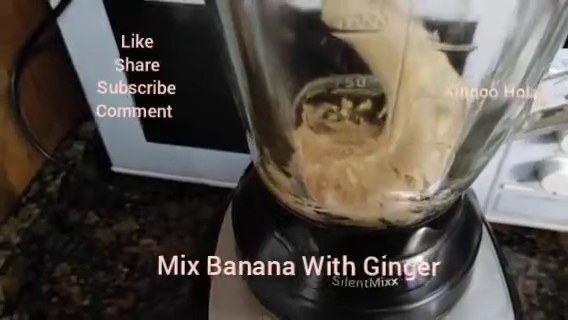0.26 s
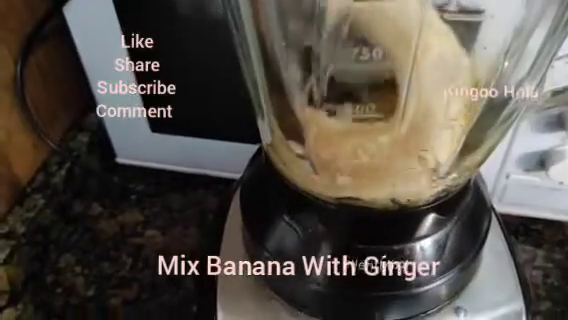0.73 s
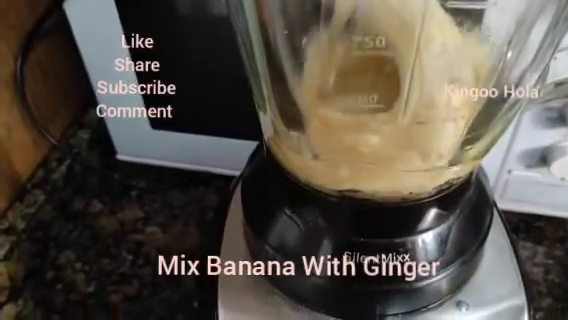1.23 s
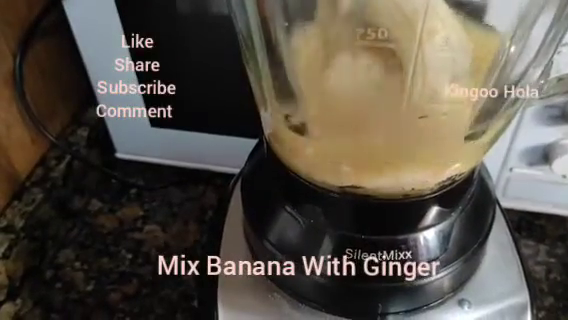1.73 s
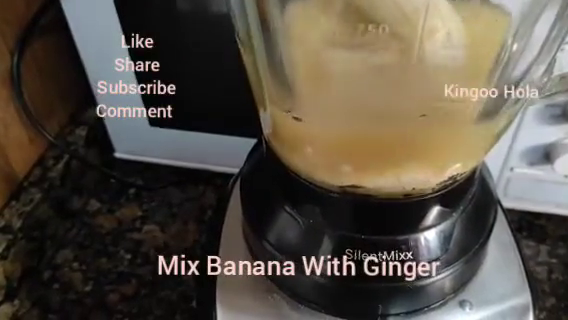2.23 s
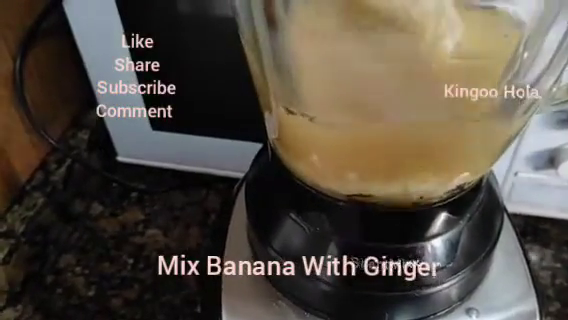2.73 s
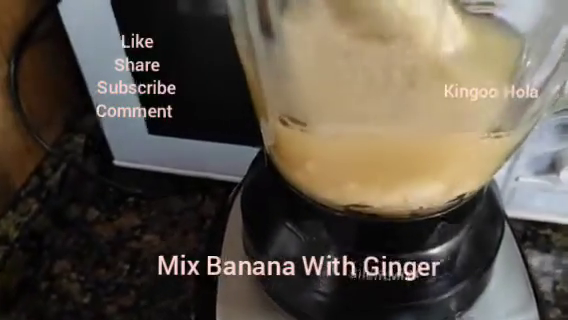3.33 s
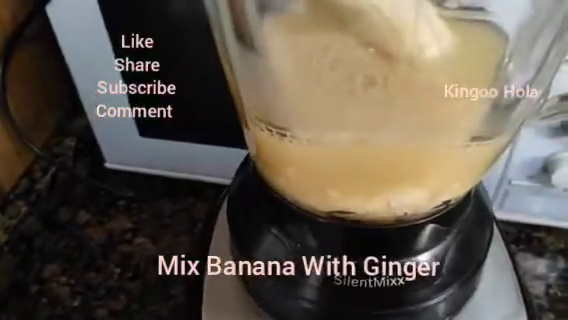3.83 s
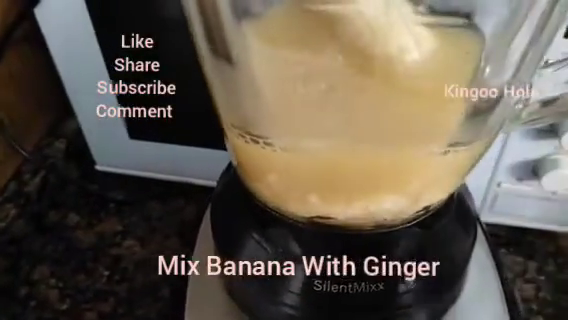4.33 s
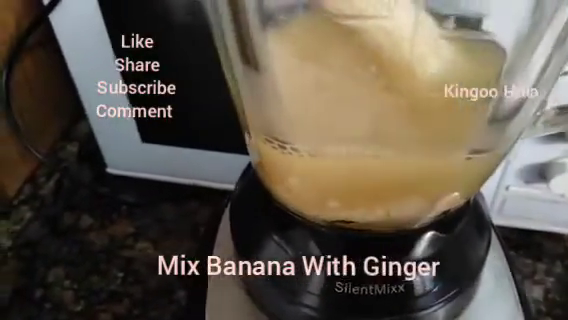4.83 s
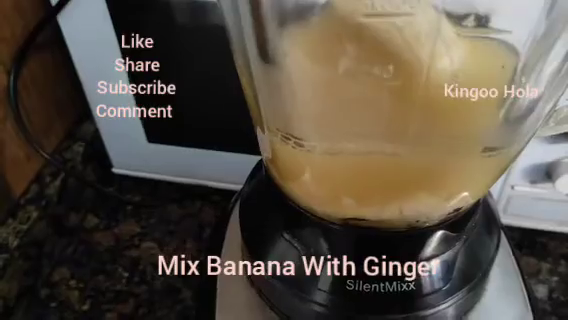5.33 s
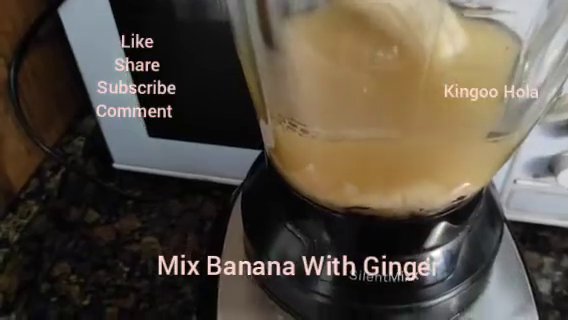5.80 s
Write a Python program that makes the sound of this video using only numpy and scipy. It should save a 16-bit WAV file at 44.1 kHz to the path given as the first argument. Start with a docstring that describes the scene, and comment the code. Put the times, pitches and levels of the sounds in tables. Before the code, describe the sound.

A thin wrapper crackles softly in a small hard kitchen, then a catch rattles open, a drawer thuds shut and a jar knocks the worktop.

```python
"""A thin wrapper rustles and crackles close by, a catch springs open with a rattle, things are touched lightly,
a drawer slides shut with a thud, and a jar is knocked down on the worktop, over air noise and a low rumble.
The wrapper is filtered noise and tiny clicks; catch, drawer and jar are damped modes with short noise bursts.
Every handled sound gets an answer from a small hard kitchen; only the jar's clear note stays dry."""
import sys
import numpy as np
from scipy import signal
from scipy.fft import rfft, irfft, next_fast_len
from scipy.io import wavfile
from scipy.ndimage import uniform_filter1d, map_coordinates

SR = 44100
rng = np.random.default_rng(int(sys.argv[2]) if len(sys.argv) > 2 else 0)


def file_out(sig):
    """Save sig as 16-bit WAV at sys.argv[1]."""
    # one column per channel
    cols = np.atleast_2d(sig).T
    # limit, then scale
    lim = np.clip(cols, -1, 1)
    pcm = np.round(lim * 32767).astype(np.int16)
    wavfile.write(sys.argv[1], SR, pcm)


N = 267246

# The background's slow swells. Each row: time in seconds, rumble level in dB, air level in dB.
BACKGROUND = [(0, -64.5, -59.5), (2.3, -72.5, -60), (2.7, -55.5, -59.5), (3.1, -61, -59), (3.5, -63.5, -59),
              (4.4, -61, -60.5), (5.0, -73, -60), (5.8, -61, -55.5)]
# Colour of the air noise. Each row: frequency in Hz, relative gain in dB.
AIR_SPECTRUM = [(12, -23.5), (20, -18.5), (49, -3.5), (70, -17), (191, -9.5), (219, -14.5), (298, -15.5),
                (324, -19), (767, -24), (881, -21.5), (1580, -30.5), (2270, -28), (4310, -36.5),
                (8400, -26.5), (15500, -77.5)]

# Pulls at the wrapper. Each row: start in seconds, length in seconds, then crumple, crackle and body level in dB.
PULLS = [(0.304, 0.038, -63, -56, -78), (.53, 0.31, -56.5, -51, -66), (0.861, 0.24, -51.5, -47, -69.5),
         (1.159, 0.14, -54.5, -70, -74), (1.403, 0.21, -58, -52.5, -58.5), (1.684, .1, -57, -56, -57.5),
         (1.885, .16, -57.5, -54, -55.5), (2.247, 0.037, -53.5, -51.5, -57), (2.393, 0.16, -59, -74, -85),
         (2.554, 0.15, -62.5, -51, -63)]
PULL_ATTACK_S, PULL_RELEASE_S = 0.0067, 0.25
# Growth over one pull as it tightens: crumple, crackle and body in dB.
PULL_SWELL_DB = [4.5, 4.5, 1.5]
# The sheet never lies still while it is held: crumple, crackle and body level in dB.
HELD_DB = [-60.5, -57.5, -69]
HELD_S, HELD_LENGTH_S = 0.48, 2.31
# Creases that snap. Each row: start in seconds, pitch in Hz, level in dB.
SNAPS = [(.316, 9100, -54), (.592, 8300, -58), (.614, 1740, -51), (.764, 8700, -48), (.886, 1730, -42),
         (.887, 7700, -47.5), (.966, 945, -51), (1.027, 7700, -38.5), (1.059, 1760, -44.5),
         (1.092, 6800, -38), (1.2, 6860, -48.5), (1.999, 6600, -48), (2.249, 6550, -45.5),
         (2.285, 5650, -49), (2.726, 3950, -48.5), (2.74, 5860, -42), (2.822, 5760, -53)]
SNAP_WIDTH, SNAP_T60_S = 0.18, 0.038  # width as a share of the pitch
# Dull bumps of what the wrapper holds. Each row: start in seconds, pitch in Hz, level in dB.
BUMPS = [(2.286, 645, -45.5), (2.675, 765, -44.5), (2.701, 700, -46.5), (2.765, 550, -45.5),
         (2.798, 504, -42.5)]
BUMP_WIDTH, BUMP_T60_S = 0.8, 0.046  # width as a share of the pitch
# Taut folds that hum. Each row: start in seconds, length in seconds, starting pitch in Hz, level in dB.
FOLDS = [(0.536, 0.26, 1077, -58), (0.881, 0.22, 1744, -56.5), (2.697, 0.024, 1440, -46)]
FOLD_CLIMB, FOLD_ATTACK_S, FOLD_RELEASE_S = 0.088, 0.0054, 0.035  # climb as a share of the starting pitch
# Colour of the wrapper. Each row: frequency in Hz, relative gain in dB.
WRAPPER_SPECTRUM = [(120, -26), (200, -18), (215, -34), (253, -7), (327, -12), (420, -7), (488, -1),
                    (596, -19), (677, -11.5), (1740, -9), (2210, -13), (4750, -11.5), (7220, -2.5),
                    (8980, -5.5), (10600, -26.5), (15500, -30.5)]

# The catch and its rattle. Each row: start in seconds, strength in dB, boom level in dB.
CATCH = [(3.691, -32.5, -63), (3.694, -19, -44.5), (3.7034, -34.5, -29), (3.7192, -29, -48.5),
         (3.724, -31.5, -47.5), (3.7392, -28, -33), (3.751, -33.5, -49.5)]
PANEL_DB, CATCH_CLICK_DB = -8.5, 0  # against the strength
# Modes of the catch's panel. Each row: frequency in Hz, level in dB, 60 dB decay in seconds.
PANEL_MODES = [(45.2, -20, .3), (84, -20, 0.49), (263, -3.5, 0.15), (356.5, -2, 0.13), (427, 3, 0.11),
               (486.6, 1, 0.13), (725, -12, .14), (1012, 0.5, 0.2), (1158, -7.5, 0.1), (1380, -2, .17),
               (1606, -5, 0.13), (1680, -2, 0.11), (2310, -4, 0.13), (2865, -5.5, .12)]
# Colour of the contacts at catch, taps and drawer. Each row: frequency in Hz, relative gain in dB.
CLACK_SPECTRUM = [(88, -34.5), (150, -5), (189, -5), (290, -5), (428, -4), (618, -16), (708, -13.5),
                  (766, -15.5), (1400, -13), (1510, -13), (2700, -15), (3700, -23), (4650, -25),
                  (8330, -14), (10100, -33), (15500, -47.5)]

# Light touches. Each row: start in seconds, level in dB, brightness in dB (treble up and bass down).
TAPS = [(3.97, -62, 2), (4.031, -71, 1), (4.076, -61, -10.5), (4.111, -68, -13), (4.149, -68, 3.5),
        (4.614, -68, -17), (5.95, -75, 19.5)]
TAP_CLACK_DB = 5  # middle register against the tap's level

# The drawer's run: it scrapes as it starts to move and rumbles as it gets going.
SCRAPE_S, SCRAPE_LENGTH_S, SCRAPE_ATTACK_S, SCRAPE_DB = 4.69, 0.26, 0.07, -41
ROLL_S, ROLL_LENGTH_S, ROLL_ATTACK_S, ROLL_DB = 4.76, 0.212, 0.12, -31
# Colour of the scrape. Each row: frequency in Hz, relative gain in dB.
SCRAPE_SPECTRUM = [(290, -28), (500, -20.5), (724, -11.5), (788, -5), (1240, -4.5), (2200, -11.5),
                   (3830, -21), (6120, -21), (7160, -11), (8860, -21), (15000, -64)]
# Colour of the rumble along the runners. Each row: frequency in Hz, relative gain in dB.
ROLL_SPECTRUM = [(50, -40), (70, -23), (87, -0.5), (105, -13), (150, 2), (230, -4), (450, -13),
                 (650, -18.5), (1000, -36), (2000, -72)]
# The drawer meeting its stop. Each row: start in seconds, thump in Hz, then weight, clack and click level in dB.
STOPS = [(4.815, 195, -42, -40.5, -38), (4.8976, 316, -28, -41, -30.5), (4.934, 148.4, -25.5, -48, -61),
         (4.949, 151, -33, -65, -70)]
DRAWER_DB = -4  # the drawer's body against the thump
# Modes of the drawer. Each row: frequency in Hz, level in dB, 60 dB decay in seconds.
DRAWER_MODES = [(86, -15, 0.35), (144.8, -0.5, 0.57), (191.4, -14, 0.7), (255, -5, 0.32), (295, -3, .3),
                (350, -10, 0.11), (387.6, -8, 0.28), (464, 5, 0.065), (583, -8.5, 0.22), (779, -3.5, 0.17)]

# The jar on the worktop. Each row: start in seconds, thump in Hz, thump 60 dB decay in seconds, weight in dB,
# hardness in dB per octave, then worktop, note, clack and click level in dB.
KNOCKS = [(5.1903, 865, 0.12, -44.5, 0, -43, -66, -38.5, -38),
          (5.255, 357, 0.02, -29, -8, -42.5, -29.5, -33, -29.5),
          (5.51, 387, 0.014, -26.5, 8, -43, -47, -29, -36),
          (6.008, 348, 0.12, -26, 11.5, -55, -39.5, -36, -42),
          (6.027, 351, 0.15, -25, 12.5, -55, -59, -37, -42.5)]
JAR_DB, LANDING_S = -3, 0.002123  # body against the thump; from rim to full weight
NOTE_HZ, NOTE_T60_S = 1023, 0.4
# Modes of the jar. Each row: frequency in Hz, level in dB, 60 dB decay in seconds.
JAR_MODES = [(448, 4.5, 0.15), (484.7, 4, 0.16), (562, 2.5, 0.11), (765, 0, 0.15), (814, -5, 0.094),
             (1114, -7.5, 0.18), (1623, -11.5, 0.055), (1722, -19.5, 0.12), (2064, -28, 0.15),
             (2480, -24.5, 0.08)]
# Modes of the worktop. Each row: frequency in Hz, level in dB, 60 dB decay in seconds.
WORKTOP_MODES = [(84.5, -7, 0.18), (153, -20, 0.15), (174.3, -3.5, 0.15)]
# Colour of the jar's contacts. Each row: frequency in Hz, relative gain in dB.
CLICK_SPECTRUM = [(150, -34), (800, 4.5), (1500, -6), (2500, -2.5), (3600, -7.5), (5500, -4), (7100, 1.5),
                  (8800, -2.5), (10000, -23.5), (15000, -36.5)]

# The kitchen's decay. Each row: frequency in Hz, 60 dB decay in seconds.
ROOM_DECAY = [(100, .5), (260, 0.4033), (700, 0.32), (2000, 0.2743), (5000, 0.3664), (8000, 0.34),
              (13000, 0.27)]
# Likeness of left and right in a diffuse field. Each row: frequency in Hz, correlation from 0 to 1.
LIKENESS = [(100, 0.94), (300, 0.89), (600, 0.42), (1200, 0), (3000, 0), (10000, 0)]
# Balance of the ears. Each row: frequency in Hz, left minus right in dB.
EAR_BALANCE = [(100, 4.5), (400, 5.5), (1200, 2.5), (2400, 2), (4400, -4), (8000, -1.5), (15000, 7)]
LOW_HZ, HIGH_HZ = 800, 3500  # borders of the three registers
TOP_HZ = 15700  # band limit


def amp(db):
    """Decibels to gain."""
    return 10 ** (np.asarray(db) / 20)


def unit(x):
    """Scaled to rms 1."""
    return x / np.sqrt(np.mean(x ** 2) + 1e-20)


def along(points, hz):
    """(Hz, value) points read on a log axis."""
    f, v = np.transpose(points)
    return np.interp(np.log(hz + 1), np.log(f + 1), v)


def colour(spectrum):
    """The gain over frequency of a spectrum table."""
    return lambda hz: amp(along(spectrum, hz))


def curves(rows):
    """One value per sample for each column after the time."""
    s, *cols = np.transpose(rows)
    return [np.interp(np.arange(N) / SR, s, c) for c in cols]


def wobble(rate):
    """A smooth random curve with rate knots a second."""
    knots = rng.standard_normal(int(N * rate / SR) + 4)
    return map_coordinates(knots, [np.arange(N) * rate / SR])


def decay(t, t60):
    """Exponential decay that falls 60 dB in t60 seconds."""
    return np.exp(-np.log(1000) * t / t60)


def coloured(x, gain):
    """x through the causal, minimum-phase filter that has this gain over frequency."""
    size = 2 * next_fast_len(x.shape[-1] // 2 + 4096)
    cepstrum = irfft(np.log(np.maximum(gain(np.fft.rfftfreq(size, 1 / SR)), 1e-6)))
    # folding the cepstrum forward in time makes the filter causal
    cepstrum[1:size // 2] *= 2
    cepstrum[size // 2 + 1:] = 0
    return irfft(rfft(x, size) * np.exp(rfft(cepstrum)), size)[..., :x.shape[-1]]


def resonance(centre_hz, width_hz):
    """The gain of one resonance with steep skirts."""
    return lambda hz: 1 / (1 + ((hz * hz - centre_hz ** 2) / (1.67 * width_hz * (hz + 1))) ** 2)


def registers(spectrum):
    """A spectrum split into the gains of its low, middle and high register."""
    under = lambda hz, edge: 1 / np.sqrt(1 + (hz / edge) ** 8)
    over = lambda hz, edge: np.sqrt(1 - under(hz, edge) ** 2)
    whole = colour(spectrum)
    return [lambda hz: whole(hz) * under(hz, LOW_HZ),
            lambda hz: whole(hz) * over(hz, LOW_HZ) * under(hz, HIGH_HZ),
            lambda hz: whole(hz) * over(hz, HIGH_HZ)]


def diffuse(size):
    """Stereo noise of a diffuse field: alike in the bass, unrelated in the treble."""
    likeness = along(LIKENESS, np.fft.rfftfreq(size, 1 / SR))
    turn = np.arccos(np.clip(likeness, -1, 1)) / 2
    mid, side = irfft(rfft(rng.standard_normal((2, size))) * [np.cos(turn), np.sin(turn)], size)
    return np.array([mid + side, mid - side])


def add(track, s, sound):
    """Mix a sound into the track at time s."""
    part = track[..., round(s * SR):][..., :sound.shape[-1]]
    part += sound[..., :part.shape[-1]]


def placed(x, pan_db, lead_ms):
    """The left ear hears it louder by pan_db and earlier by lead_ms."""
    size = next_fast_len(N + SR // 8)
    half = np.array([[.5], [-.5]])
    shift = np.exp(2j * np.pi * np.fft.rfftfreq(size, 1000 / SR) * lead_ms * half)
    return irfft(rfft(x, size) * shift * amp(pan_db * half), size)[:, :N]


def in_room(x, wet_db):
    """The sound plus the kitchen's answer: diffuse noise, each frequency dying at its own speed."""
    hz, t, z = signal.stft(diffuse(SR * 2 // 3), SR, nperseg=256)
    tail = signal.istft(z * decay(t, along(ROOM_DECAY, hz)[:, None]), SR, nperseg=256)[1]
    # the answer starts 1/300 s late
    tail = np.pad(tail / np.linalg.norm(tail[0]), ((0, 0), (SR // 300, 0)))
    return x + amp(wet_db) * signal.fftconvolve(x, tail, axes=1)[:, :x.shape[1]]


def blow(x):
    """Scaled to rms 1 over the first fiftieth of a second."""
    return x / np.sqrt(np.mean(x[..., :SR // 50] ** 2) + 1e-20)


def ring(modes, scatter_db, rise):
    """Damped modes that build up over rise seconds, their strengths scattered at random by scatter_db."""
    t = np.arange(SR * 2 // 3) / SR
    hz, db, t60 = np.transpose(modes)[:, :, None]
    sign = (-1) ** np.arange(len(hz))[:, None]
    strength = sign * amp(db + scatter_db * rng.standard_normal(hz.shape))
    tones = strength * decay(t, t60) * np.sin(2 * np.pi * hz * t)
    return blow(np.sum(tones, 0) * (1 - np.exp(-(t / rise) ** 2)))


def crack(gain, t60, spread, rise=0.00079):
    """The burst of one contact: coloured noise that dies at once, partly different at each ear."""
    t = np.arange(SR // 8) / SR
    noise = rng.standard_normal(len(t)) + spread * diffuse(len(t))
    burst = noise * decay(t, t60) * (1 - np.exp(-t / rise))
    return blow(coloured(burst, gain))


def crinkle(rate, size_db, hiss):
    """Tiny buckles of unequal size, coming in clumps over a sliding hiss."""
    chance = rate / SR * amp(4 * wobble(45))
    sizes = amp(size_db * np.minimum(rng.exponential(size=N), 4)) * rng.choice([-1, 1], N)
    buckles = unit((rng.random(N) < chance) * sizes)
    return buckles + hiss * diffuse(N)


def patchy(x, depth_db):
    """Short narrow patches of random gain, so that each moment favours its own pitches."""
    z = signal.stft(x, nperseg=256)[2]
    field = rng.standard_normal(z.shape[1:])
    for _ in range(2):
        field = uniform_filter1d(uniform_filter1d(field, size=4, axis=0), size=4, axis=1)
    return signal.istft(z * amp(depth_db * unit(field)), nperseg=256)[1][:, :N]


def stroke(s, length, attack, release):
    """The gain of one movement: it rises over attack, holds, and dies 60 dB over release."""
    t = np.arange(N) / SR - s
    return np.clip(t / attack, 0, 1) * decay(np.maximum(t - length, 0), release)


def progress(s, length):
    """From 0 to 1 over one movement."""
    return np.clip((np.arange(N) / SR - s) / length, 0, 1)


def background():
    """Air noise with a soft drone, over a rumble that swells and sinks; all are filtered diffuse noise."""
    rumble_db, air_db = curves(BACKGROUND)
    narrow = lambda centre_hz, width_hz: unit(coloured(diffuse(N), resonance(centre_hz, width_hz)))
    air = amp(air_db + 0.5 * wobble(4.3)) * unit(coloured(diffuse(N), colour(AIR_SPECTRUM)))
    drone = amp(-65.5) * narrow(centre_hz=187.4, width_hz=13.8)
    rumble = amp(rumble_db) * narrow(centre_hz=39.5, width_hz=6)
    return air + drone + rumble


def handling():
    """Gains of crumple, crackle and body: the pulls on top of the stir of the held sheet, summed as power."""
    held = stroke(HELD_S, HELD_LENGTH_S, attack=0.062, release=0.25)
    power = (amp(HELD_DB)[:, None] * held) ** 2
    for s, length, *levels in PULLS:
        shape = stroke(s, length, PULL_ATTACK_S, PULL_RELEASE_S)
        tension = progress(s, length) - 0.5
        pull = [amp(db + swell * tension) * shape for db, swell in zip(levels, PULL_SWELL_DB)]
        power += np.array(pull) ** 2
    return np.sqrt(power)


def folds():
    """A taut fold hums through one resonance that climbs as it shortens: a gliding tone with random modulation."""
    carrier = np.zeros(N, complex)
    for s, length, hz, db in FOLDS:
        pitch = hz * (1 + FOLD_CLIMB * progress(s, length))
        tone = np.exp(2j * np.pi * np.cumsum(pitch) / SR)
        carrier += amp(db) * stroke(s, length, FOLD_ATTACK_S, FOLD_RELEASE_S) * tone
    ears = np.array([wobble(300) + 1j * wobble(300) for _ in range(2)])
    # each ear also gets a share of the other's modulation
    return np.real((ears + 0.82 * ears[::-1]) * carrier)


def wrapper():
    """A thin sheet is pulled and crumpled; now and then a crease snaps or its contents bump."""
    crumple, crackle, body = handling()
    low, middle, high = registers(WRAPPER_SPECTRUM)
    dull = crinkle(rate=440, size_db=1, hiss=0.77)
    papery = patchy(crinkle(rate=850, size_db=1.5, hiss=1.53), depth_db=4.5)
    crisp = patchy(crinkle(rate=2300, size_db=-1, hiss=1.86), depth_db=5.5)
    out = body * unit(coloured(dull, low))
    out += crumple * unit(coloured(papery, middle))
    out += crackle * unit(coloured(crisp, high))
    out += folds()
    sheet = colour(WRAPPER_SPECTRUM)
    for table, width, t60 in (SNAPS, SNAP_WIDTH, SNAP_T60_S), (BUMPS, BUMP_WIDTH, BUMP_T60_S):
        for s, hz, db in table:
            pitch = resonance(hz, width * hz)
            add(out, s, amp(db) * crack(lambda f: pitch(f) * sheet(f), t60=t60, spread=0.93, rise=0.00092))
    return in_room(placed(out, pan_db=-1.0, lead_ms=-0.11), wet_db=-6.0)


def catch():
    """A catch springs open and chatters against its panel, whose modes ring; the hollow behind booms."""
    out = np.zeros((2, N))
    _, middle, high = registers(CLACK_SPECTRUM)
    for s, db, boom in CATCH:
        add(out, s, amp(boom) * ring([(176.7, 0, 0.15)], scatter_db=0, rise=0.00097))
        add(out, s, amp(db + PANEL_DB) * ring(PANEL_MODES, scatter_db=5, rise=0.0013))
        add(out, s, amp(db) * crack(middle, t60=0.06, spread=1.0))
        add(out, s, amp(db + CATCH_CLICK_DB) * crack(high, t60=0.068, spread=6))
    return in_room(placed(out, pan_db=0.0, lead_ms=0.22), wet_db=-5.0)


def taps():
    """Things on the counter are touched lightly: noise bursts in three registers, each tap with its own brightness."""
    out = np.zeros((2, N))
    for s, db, bright_db in TAPS:
        for register_db, gain in zip((-bright_db, TAP_CLACK_DB, bright_db), registers(CLACK_SPECTRUM)):
            add(out, s, amp(db + register_db) * crack(gain, t60=0.072, spread=0.63))
    return in_room(out, wet_db=-2.5)


def drawer():
    """The drawer scrapes and rumbles along its runners as crinkled noise, then thuds into its stop as modes."""
    grating = patchy(crinkle(rate=1500, size_db=2.5, hiss=2.8), depth_db=3.5)
    scrape = unit(coloured(grating, colour(SCRAPE_SPECTRUM)))
    rumble = unit(coloured(crinkle(rate=330, size_db=-1, hiss=0.92), colour(ROLL_SPECTRUM)))
    # squaring the scrape's stroke curves its rise and doubles its fall in dB
    out = amp(SCRAPE_DB) * stroke(SCRAPE_S, SCRAPE_LENGTH_S, SCRAPE_ATTACK_S, release=0.15) ** 2 * scrape
    out += amp(ROLL_DB) * stroke(ROLL_S, ROLL_LENGTH_S, ROLL_ATTACK_S, release=0.09) * rumble
    _, middle, high = registers(CLACK_SPECTRUM)
    for s, thump_hz, weight, clack, click in STOPS:
        add(out, s, amp(weight) * ring([(thump_hz, 0, 0.045)], scatter_db=0, rise=0.0084))
        add(out, s, amp(weight + DRAWER_DB) * ring(DRAWER_MODES, scatter_db=0.0, rise=0.0027))
        add(out, s, amp(clack) * crack(middle, t60=0.12, spread=1.0))
        add(out, s, amp(click) * crack(high, t60=0.02, spread=4))
    return in_room(placed(out, pan_db=-1.0, lead_ms=-0.063), wet_db=-7.0)


def jar():
    """The rim clicks first, then the weight lands: a thump, the jar's body, the worktop and one clear lasting note."""
    out, sung = np.zeros((2, N)), np.zeros(N)
    _, middle, high = registers(CLICK_SPECTRUM)
    for s, thump_hz, t60, weight, hardness, worktop, note, clack, click in KNOCKS:
        # a harder knock tilts the body's modes towards the treble
        body = [(hz, db + hardness * np.log2(hz / LOW_HZ), life) for hz, db, life in JAR_MODES]
        landed = s + LANDING_S
        add(out, s, amp(click) * crack(high, t60=0.032, spread=1.2))
        add(out, s, amp(clack) * crack(middle, t60=0.037, spread=0.87, rise=0.00084))
        add(out, landed, amp(weight) * ring([(thump_hz, 0, t60)], scatter_db=0, rise=0.0025))
        add(out, landed, amp(weight + JAR_DB) * ring(body, scatter_db=2.5, rise=0.0017))
        add(out, landed, amp(worktop) * ring(WORKTOP_MODES, scatter_db=3, rise=0.015))
        add(sung, landed, amp(note) * ring([(NOTE_HZ, 0, NOTE_T60_S)], scatter_db=0, rise=0.00052))
    knocks = in_room(placed(out, pan_db=-1.0, lead_ms=-0.14), wet_db=-8.5)
    # the note's standing wave is much stronger at the left ear
    return knocks + placed(sung, pan_db=11.5, lead_ms=0.27)


def scene():
    """Everything on and around the counter."""
    return background() + wrapper() + catch() + taps() + drawer() + jar()


def record(dry):
    """The ears differ in tone, the deepest bass rolls off and nothing passes above the band limit."""
    size = next_fast_len(N + SR // 2)
    hz = np.fft.rfftfreq(size, 1 / SR)
    balance = amp(along(EAR_BALANCE, hz) * np.array([[.5], [-.5]]))
    bass_cut = 1 / np.sqrt(1 + (28 / (hz + 1)) ** 6)
    return irfft(rfft(dry, size) * balance * bass_cut * (hz < TOP_HZ), size)[:, :N]


dry = scene()
out = record(dry)
file_out(out)
```